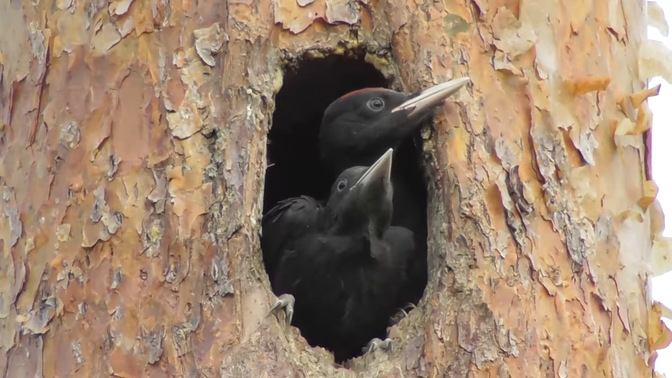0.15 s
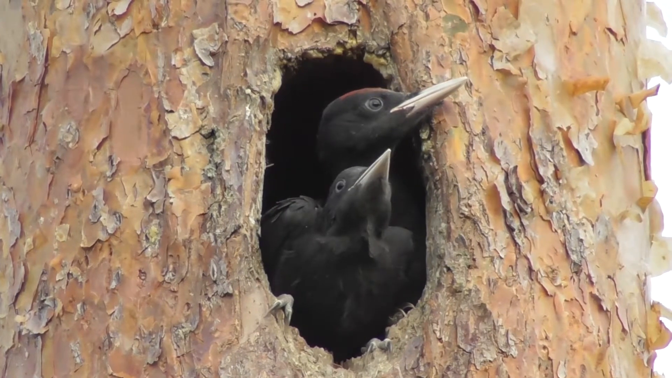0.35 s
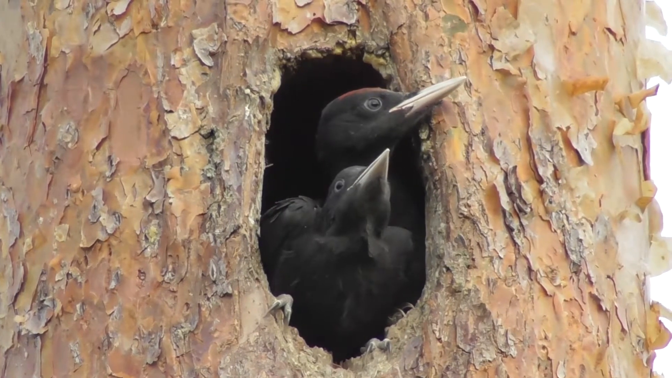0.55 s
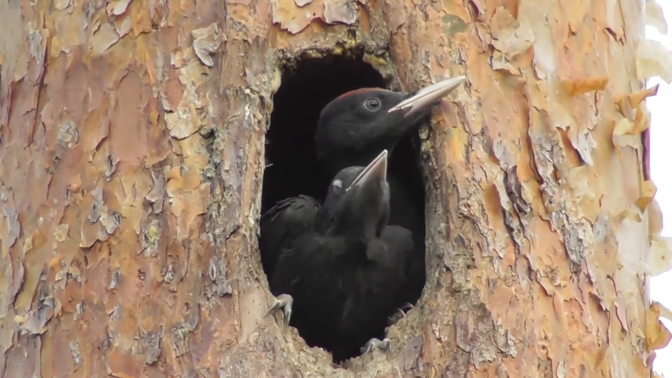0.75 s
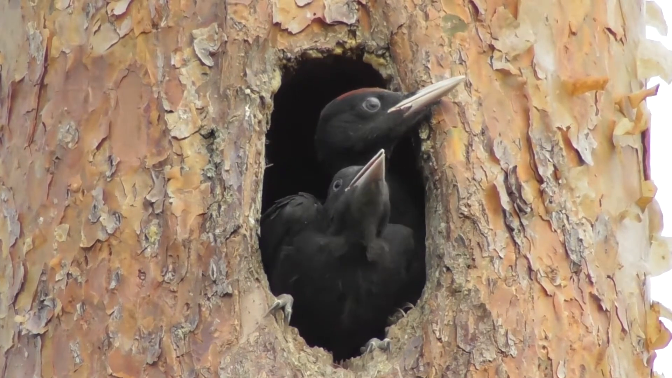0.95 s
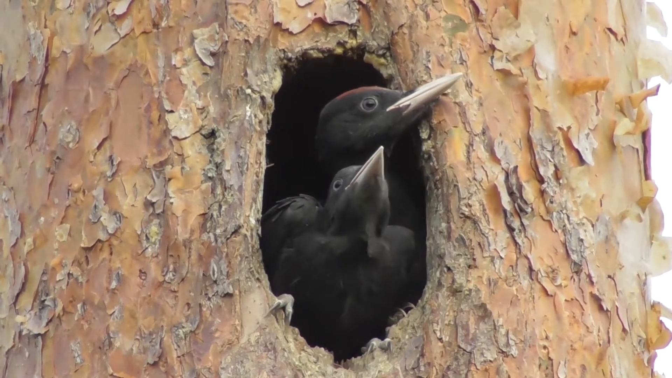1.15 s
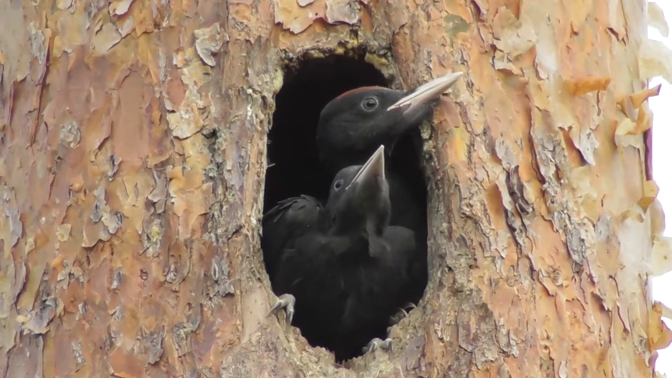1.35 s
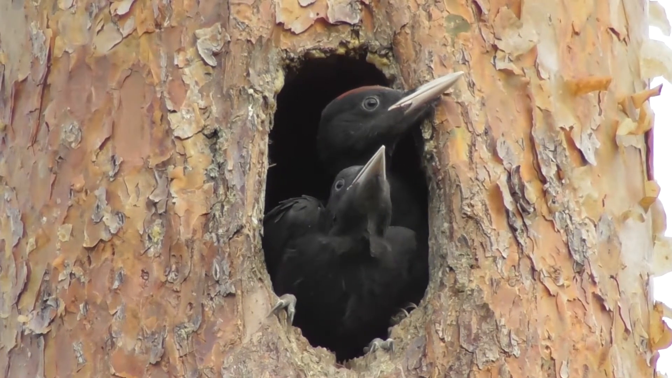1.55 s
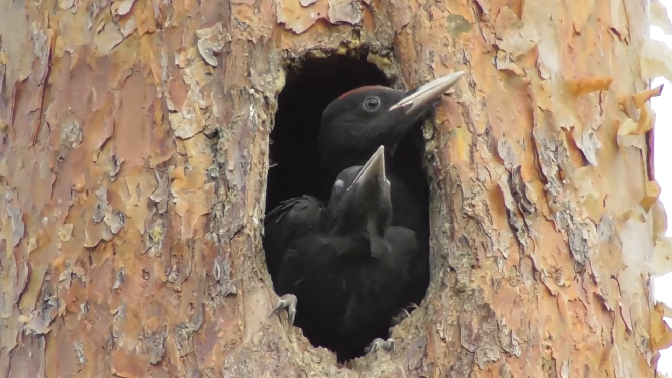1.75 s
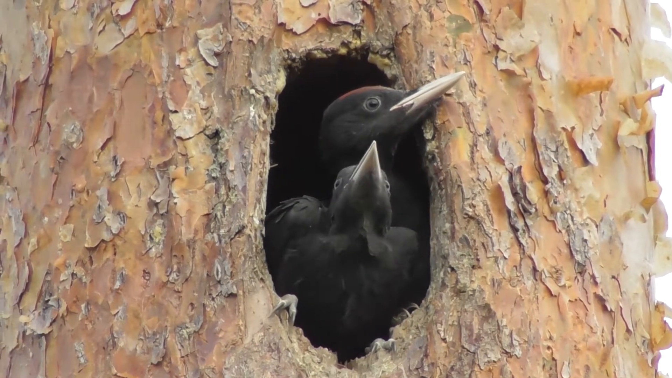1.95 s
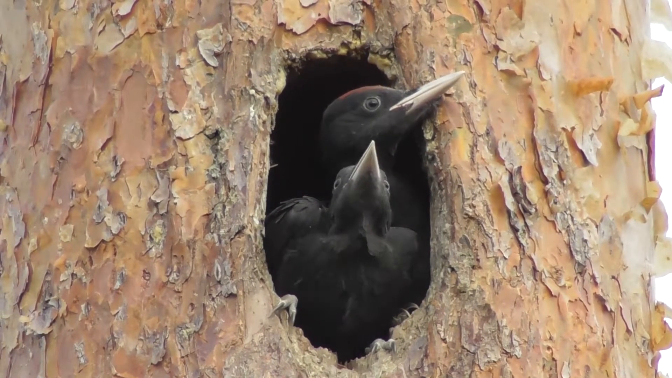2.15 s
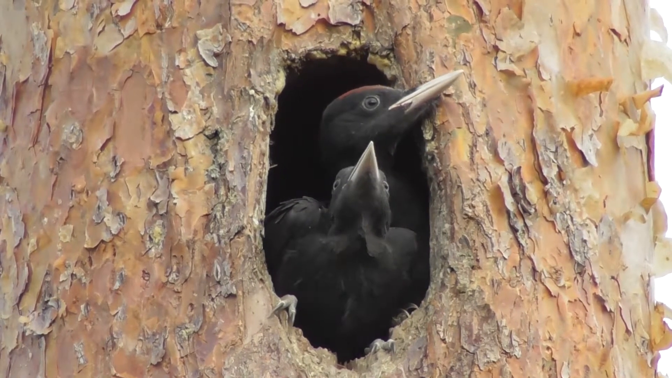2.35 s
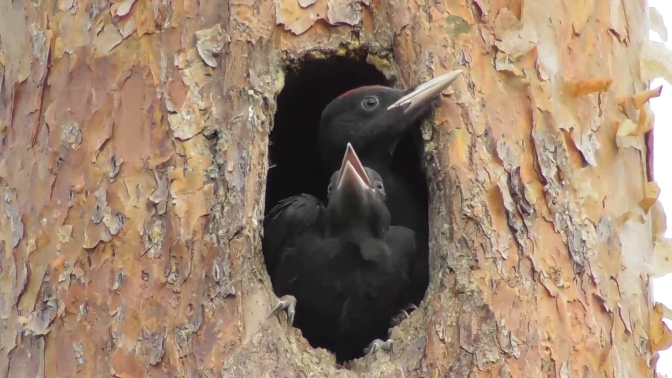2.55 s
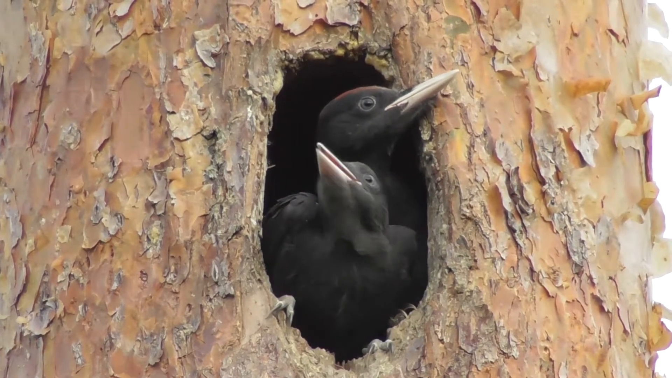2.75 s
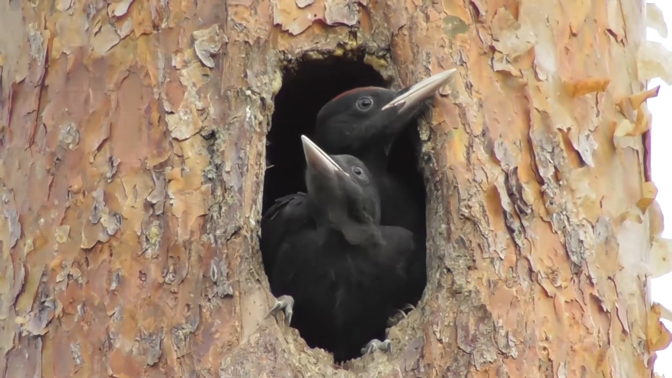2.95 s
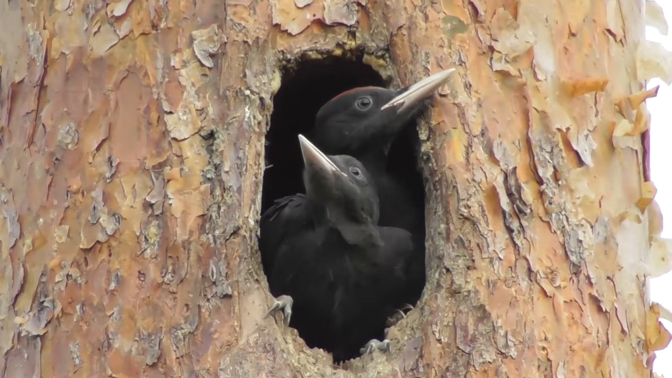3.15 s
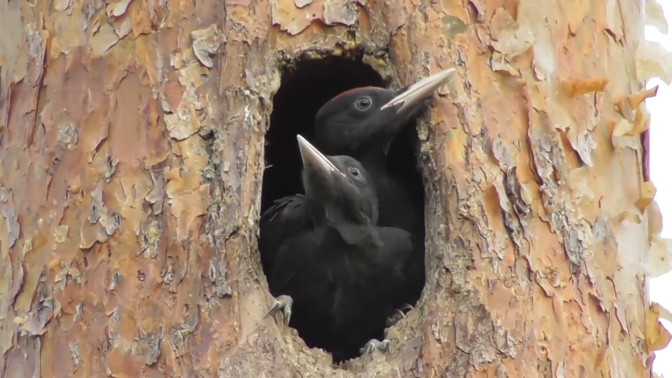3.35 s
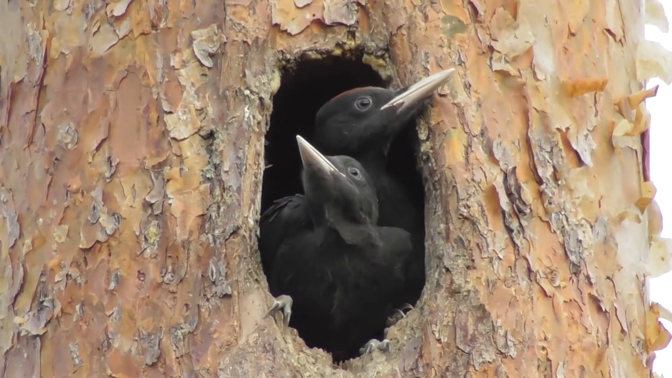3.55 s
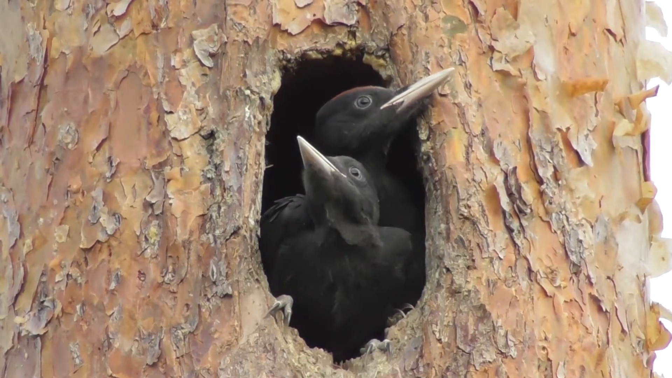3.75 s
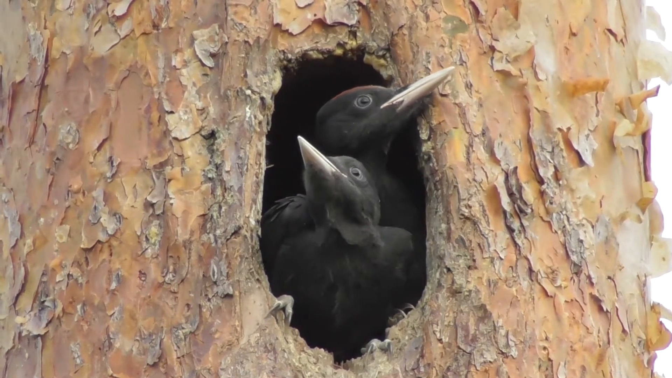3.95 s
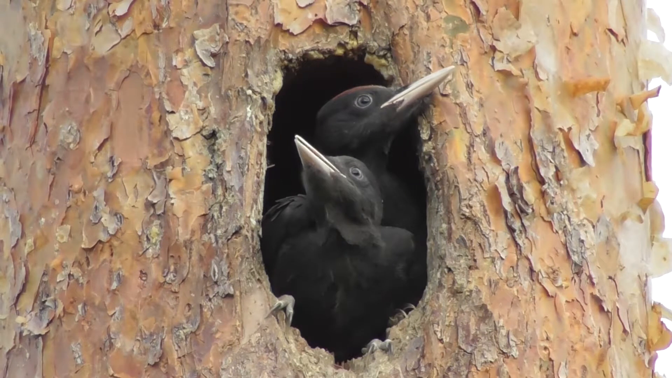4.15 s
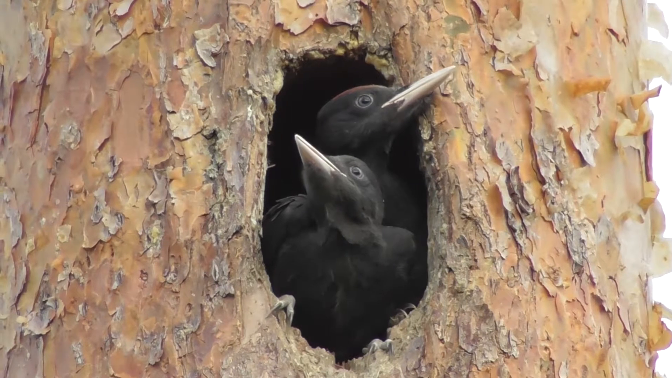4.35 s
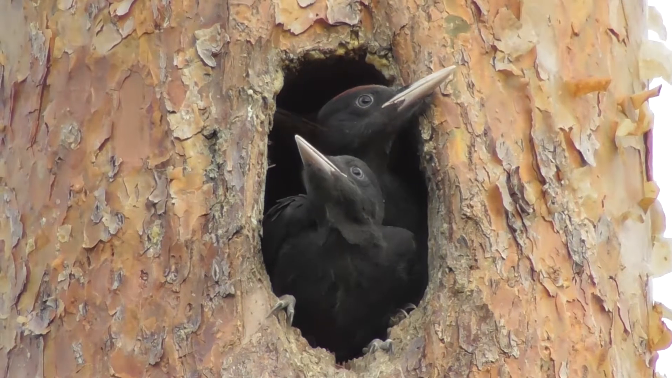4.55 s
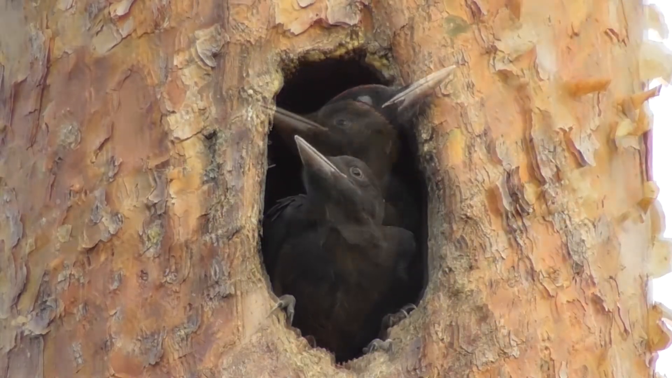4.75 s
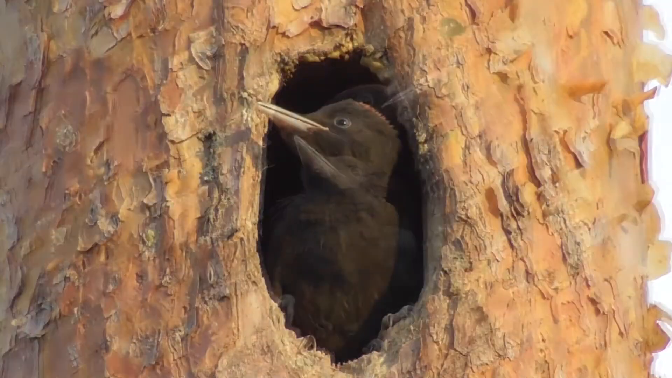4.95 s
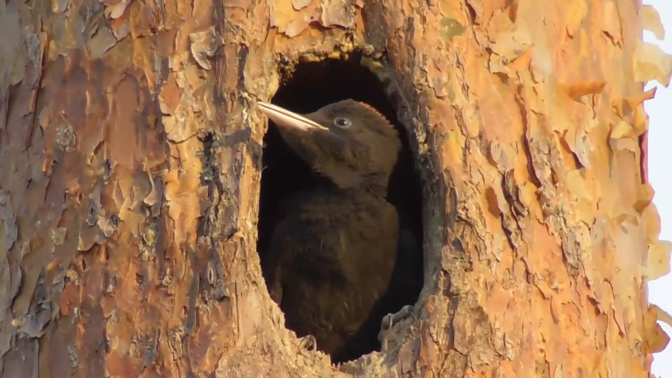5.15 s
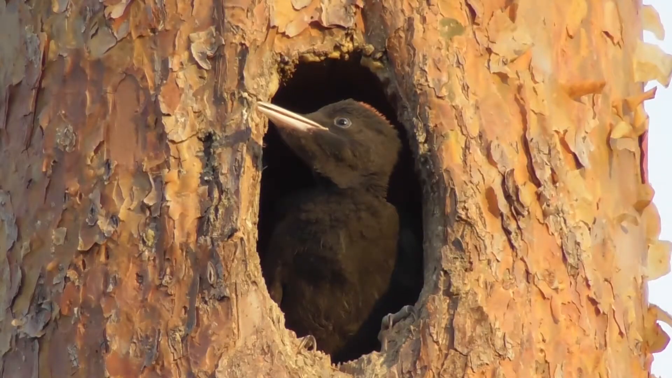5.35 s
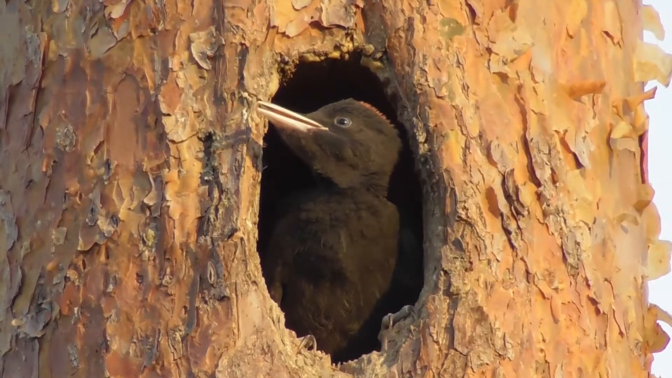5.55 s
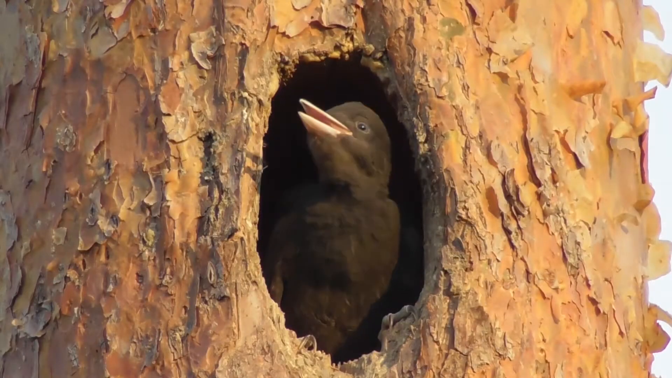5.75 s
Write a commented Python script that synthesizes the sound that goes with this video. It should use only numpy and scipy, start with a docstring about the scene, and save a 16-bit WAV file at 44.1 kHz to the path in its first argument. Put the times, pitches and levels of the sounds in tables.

```python
"""Distant traffic rumble and microphone hiss run throughout as shaped noise, under far songbirds' gliding tones.
Young woodpeckers soon yelp from a nest hole: short arched notes, an overtone stack filtered by the throat,
raspy with breath noise at start and end. Bills smack open with a tick and a low ring.
The trees answer the calls with a long thin echo: noise tails whose decay depends on frequency.
Later the far birds add rising whistles, repeated sweeps, buzzing trills and falling chips."""
import sys
import numpy as np
from scipy import signal
from scipy.fft import rfft, irfft, next_fast_len
from scipy.io import wavfile
from scipy.ndimage import uniform_filter1d, map_coordinates

SR = 44100
rng = np.random.default_rng(int(sys.argv[2]) if len(sys.argv) > 2 else 0)


def materialize(psi):
    """Save the field psi as 16-bit PCM at rate SR to the path in sys.argv[1].

    A 1-D psi becomes a single channel; in a 2-D psi each row is a channel.
    """
    bounded = np.clip(np.atleast_2d(psi).T, -1, 1)
    quanta = np.round(bounded * 32767).astype(np.int16)
    wavfile.write(sys.argv[1], SR, quanta)


N = 256199  # length in samples
TOP_HZ = 15700  # upper band limit


def amp(db):
    """Level law: 20 dB is a factor of ten in amplitude."""
    return 10 ** (np.asarray(db) / 20)


def unit(x):
    """Normalisation to a root mean square of one."""
    return x / np.sqrt(np.mean(x ** 2) + 1e-20)


def along(points, hz):
    """Interpolation of (Hz, value) points on a logarithmic frequency axis."""
    f, v = np.transpose(points)
    return np.interp(np.log(hz + 1), np.log(f + 1), v)


def wobble(rate, size):
    """Random modulation: a smooth curve through rate random knots a second."""
    knots = rng.standard_normal(int(size * rate / SR) + 4)
    return map_coordinates(knots, [np.arange(size) * rate / SR])


def filtered(x, response):
    """Linear filtering: the spectrum times a response of frequency."""
    m = next_fast_len(x.shape[-1] + 4096)
    spectrum = rfft(x, m) * response(np.fft.rfftfreq(m, 1 / SR))
    return irfft(spectrum, m)[..., :x.shape[-1]]


def add(track, s, sound):
    """Superposition: mixes a sound into the track at s seconds."""
    part = track[round(s * SR):][:len(sound)]
    part += sound[:len(part)]


# left-right balance: pitch_hz [Hz], left_minus_right_db [dB]
BALANCE = [(60, 5.5), (180, 2.5), (550, 1.5), (1650, 1.0), (4970, 0), (15000, 0.0)]


def leaned(pair):
    """Interchannel level difference: each side takes half, with opposite signs."""
    return filtered(pair, lambda hz: amp(np.outer([.5, -.5], along(BALANCE, hz))))


# slow levels of the air: start_s [s], rumble_db, roar_db, chorus_db, hiss_db [dB]
AIR_LEVELS = [(0.0, -58, -59.5, -74.5, -70.5), (0.6, -60.5, -59, -75.5, -70),
              (1.25, -56.5, -58, -75.5, -69.5), (2.1, -60, -59.5, -77.5, -70.5),
              (3.5, -59.5, -59, -73, -70), (4.63, -57, -59, -74, -69.5), (5.05, -60.5, -56, -74.5, -68),
              (5.81, -59, -57, -72.5, -69)]
# spectrum shapes of the four layers: pitch_hz [Hz], density_db [relative dB per Hz]
RUMBLE_SHAPE = [(12, -46), (20, -30), (22, -12), (38, -12.5), (61, -7.5), (75, 2.5), (88, 0), (124, -5),
                (150, -1.5), (177, -8), (199, -5), (217, -14), (260, -16.5), (340, -51), (570, -120)]
ROAR_SHAPE = [(130, -23), (220, -7), (275, -5), (350, -2.5), (461, -2.5), (692, -5.5), (1140, -13),
              (1600, -39), (2080, -55), (3520, -120)]
CHORUS_SHAPE = [(820, -28), (1400, -4.5), (1550, -14), (1810, -11), (2020, -4), (2400, -10), (2530, -12),
                (2840, -18), (2970, -12.5), (3310, -8), (5200, -18.5), (6760, -50), (11400, -120)]
HISS_SHAPE = [(2940, -57), (5000, -10), (5420, -12), (8470, -2), (9180, -3), (12300, -3.5), (15600, -3)]
# likeness of left and right noise: pitch_hz [Hz], correlation [-1 to 1]
LIKENESS = [(25, 0.59), (60, 0.88), (130, 0.85), (260, 0.21), (380, 0.71), (800, 0.74), (1650, 0.92),
            (2400, 1), (5000, 1), (7200, 0.98), (10400, 0.5), (15000, 0.21)]


def background():
    """Diffuse noise: four partly correlated layers, each with patches of random gain and a slow level."""
    start_s, *levels_db = np.transpose(AIR_LEVELS)
    shapes = (RUMBLE_SHAPE, ROAR_SHAPE, CHORUS_SHAPE, HISS_SHAPE)
    out = np.zeros((2, N))
    # the angle between mid and side sets the left-right correlation
    turn = lambda hz: np.arccos(np.clip(along(LIKENESS, hz), -1, 1)) / 2
    for level_db, shape, patchy_db in zip(levels_db, shapes, (0.85, 0.6, 3.5, 0.37)):
        cells = signal.stft(rng.standard_normal((2, N + 512)), nperseg=1024)[2]
        patches = uniform_filter1d(rng.standard_normal(cells.shape[1:]), 3, axis=0)
        patches = uniform_filter1d(patches, 12, axis=1)
        pair = signal.istft(cells * amp(patchy_db * unit(patches)), nperseg=1024)[1][:, :N]
        mid, side = filtered(pair, lambda hz: amp(along(shape, hz)) * [np.cos(turn(hz)), np.sin(turn(hz))])
        layer = leaned(np.array([mid + side, mid - side]))
        loudness = np.sqrt(np.mean(layer.mean(0) ** 2))
        out += amp(np.interp(np.arange(N) / SR, start_s, level_db)) * layer / loudness
    return out


def glide(start_s, end_s, first_hz, middle_hz, last_hz, level_db):
    """Frequency modulation: a pure tone on a smooth log-pitch curve through three pitches."""
    u = np.linspace(0, 1, round((end_s - start_s) * SR))
    curve = np.polyfit([0, .5, 1], np.log([first_hz, middle_hz, last_hz]), 2)
    hz = np.exp(np.polyval(curve, u))
    hz = hz * (1 + 0.0056 * wobble(155, len(u)))  # unsteady breath blurs the line
    waver_db = 1.5 * wobble(70, len(u))
    swell = abs(np.sin(np.pi * u)) ** .7
    return amp(level_db + waver_db) * swell * np.sin(2 * np.pi * np.cumsum(hz) / SR)


# far songbird whistles: start_s, end_s [s], first_hz, middle_hz, last_hz [Hz], level_db [dB before the path]
WHISTLES = [(0.037, .45, 2137, 1950, 1997, -78), (3.047, 3.443, 1590, 1573, 1578, -73),
            (3.426, 3.546, 1588, 1540, 1380, -77), (3.255, 3.366, 4190, 4250, 4200, -79),
            (3.459, 3.62, 4220, 4240, 4180, -79.5), (3.595, 3.684, 2440, 2376, 2320, -79),
            (3.72, 3.797, 3650, 3860, 4220, -67.5), (3.722, 4.091, 2390, 2300, 2252, -80),
            (3.967, 4.032, 3640, 3860, 4070, -68), (4.002, 4.122, 2050, 2006, 1810, -74.5),
            (4.101, 4.181, 3980, 3920, 3470, -64.5), (4.178, 4.218, 3680, 3300, 3000, -68.5),
            (4.736, 4.778, 3510, 3230, 2570, -67), (4.792, 4.86, 3040, 3040, 3020, -70),
            (4.877, 4.957, 2996, 3204, 3620, -59.5), (4.983, 5.023, 2290, 2900, 3100, -62.5),
            (5.013, 5.129, 3120, 3350, 3230, -66.5), (5.16, 5.208, 5950, 6370, 6500, -69),
            (5.21, 5.28, 7200, 7150, 7100, -67.5), (5.256, 5.295, 4290, 3950, 3850, -65),
            (5.258, 5.282, 6700, 5900, 5130, -72), (5.46, 5.49, 6300, 6250, 6350, -72),
            (5.544, 5.572, 6320, 6350, 6300, -70)]


def whistles(track):
    """Pure-tone radiation: each far whistle is one gliding sinusoid."""
    for whistle in WHISTLES:
        add(track, whistle[0], glide(*whistle))


LEAD_S, LEAD_DB_PER_S = .036, 993  # breath swells before the voice catches
ARCH_SHARE, CREST_SHARE = 0.0214, 0.49  # pitch drop at the arch ends; crest time over clear time
ARCH_DB_PER_S = 66  # level drop at the arch ends, per second of clear part
STUTTER_DB, STUTTER_PER_S = 2.2, 170  # slack membranes start and stop
BREAK_S, TAIL_DB_PER_S = 0.0072, 250  # the voice breaks down to a falling tail
RELEASE_S, RELEASE_DB = .016, 17.5  # extra drop after the tail
LEAD_RASP, CLEAR_RASP, TAIL_RASP = 0.864, 0.022, 0.75  # breath power share; the tail's adds to the clear one
FRAY_S = 0.0104  # time constant in which the tail frays


def gesture(on, clear, top_hz, db, lead_db, tail, tail_db, slack_hz, snap, slacken):
    """Membrane tension sets pitch: time, pitch, level and rasp of breathy lead-in, clear arch, raspy tail."""
    off = on + clear
    t = np.arange(on - LEAD_S, off + tail + RELEASE_S, 1 / SR)
    after = np.clip(t - off, 0, None)
    arch = np.interp(t, [on, on + CREST_SHARE * clear, off], [1, 0, 1]) ** 2  # zero at the crest
    sag = (1 + 2 * after / slacken) * np.exp(-2 * after / slacken)
    tension = np.interp(t, [on - snap, on, on + snap / 2], [0, .82, 1]) * sag
    hz = slack_hz + tension * (top_hz * (1 - ARCH_SHARE * arch) - slack_hz)

    voiced = db - ARCH_DB_PER_S * clear * arch
    release = RELEASE_DB * np.clip(after - tail, 0, None) / RELEASE_S
    trailing = tail_db - TAIL_DB_PER_S * after - release
    leading = lead_db - LEAD_DB_PER_S * np.clip(on - snap - t, 0, None)
    caught = np.clip((t - on) / 0.0021 + 1, 0, 1)
    broken = 1 - np.exp(-after / BREAK_S)
    level = caught * ((1 - broken) * voiced + broken * trailing) + (1 - caught) * leading

    rasp = np.interp(t, [on - 0.68 * snap, on], [LEAD_RASP, CLEAR_RASP])
    rasp = np.clip(rasp + TAIL_RASP * (1 - np.exp(-after / FRAY_S)), 0, 1)
    stutter = STUTTER_DB * np.sqrt(rasp) * wobble(STUTTER_PER_S, len(t))
    return t, hz, level + stutter, rasp


# windpipe and bill resonances: pitch_hz [Hz], gain_db [dB]
THROAT_GAIN = [(600, -59), (1100, -1.5), (1700, -19.5), (2150, -6.5), (2800, -5.5), (3350, -1), (4200, -12),
               (4850, -25), (5450, -25.5), (5800, -29.5), (6500, -19), (7100, -1.5), (8400, -3),
               (10000, -12.5), (12000, -24.5), (15500, -31)]
# nestling notes: start_s, clear_s [s], top_hz [Hz], level_db, lead_in_db [dB], tail_s [s], tail_db [dB],
# slack_hz [Hz], tighten_s, slacken_s [s], treble_db [dB above 6 kHz], throat_stretch [resonance ratio]
YELPS = [(.782, 0.0097, 1413, -36, -37.5, 0.015, -44, 1162, 0.0053, 0.007, -0.9, 0.99),
         (0.9696, 0.028, 1629, -30, -40, 0.049, -40, 1061, 0.0028, .011, 0, 0.95),
         (1.069, 0.0053, 1422, -34.5, -50, 0.012, -38.5, 1088, 0.0028, 0.004, -0.5, 0.91),
         (2.639, 0.018, 1415, -33, -39.5, 0.015, -44.5, 1076, 0.0059, 0.0046, 1.1, 0.97),
         (2.8158, 0.028, 1690, -27.5, -41, 0.039, -37, 1150, 0.0036, 0.0087, 0.6, 0.98),
         (2.9124, .007, 1382, -37, -49, 0.0089, -41, 1098, 0.0027, 0.00384, -3, 0.93),
         (5.7368, 0.027, 1699, -27, -39.5, 0.012, -35.5, 1236, 0.00326, 0.0064, 5.5, 0.98),
         (5.7895, .0065, 1738, -28, -36, 0.015, -30.5, 1260, 0.0042, 0.0068, 5.5, 0.96)]


def nestlings():
    """Source and filter: overtones slide through a fixed throat; slack membranes add jitter and pulsed breath."""
    out = np.zeros(N)
    for *note, treble_db, stretch in YELPS:
        t, hz, db, rasp = gesture(*note)
        throat = lambda f: amp(along(THROAT_GAIN, f / stretch) + treble_db * (f > 6000))
        # breath is brighter than the voice
        breath_colour = lambda f: throat(f) * amp(5.2 * np.log2(f / 5000 + 0.14))
        hz = hz * (1 + 0.0897 * rasp * wobble(501.3, len(t)))
        phase = 2 * np.pi * np.cumsum(hz) / SR
        k = np.arange(1, 15)[:, None]  # overtone numbers
        sizes = throat(k * abs(hz)) * (k * hz < TOP_HZ)
        overtones = np.sum(sizes * np.sin(k * phase + 1.4 * k * k), 0)
        tone = overtones / np.sqrt(np.sum(sizes ** 2, 0) / 2)
        pulses = 1 + 0.38 * np.cos(phase)  # one a cycle
        breath = unit(filtered(rng.standard_normal(len(t)) * pulses, breath_colour))
        fade = np.clip((t[-1] - t) / 0.00085, 0, 1) * np.clip((t - t[0]) / 0.00067, 0, 1)
        add(out, t[0], amp(db) * fade * (np.sqrt(1 - rasp) * tone + np.sqrt(rasp) * breath))
    return out


# the bill smacks open: start_s [s], level_db [dB, before common gain], hollow_db [dB, relative ring]
BILL_CLACKS = [(0.936, -41, 0), (2.786, -38.5, -2.5), (5.700, -44.5, 4)]


def clacks():
    """Impulse and cavity resonance: a dry tick, then the nest hollow answers with one low ring."""
    out, t = np.zeros(N), np.arange(SR // 30) / SR
    for s, db, hollow_db in BILL_CLACKS:
        noise = filtered(rng.standard_normal(len(t)), lambda f: amp(0.57 * along(THROAT_GAIN, f)))
        tick = amp(-60 * t / 0.1) * unit(noise)
        ring = np.sin(2 * np.pi * 850 * t) * (1 - np.exp(-t / 0.0019))
        hollow = amp(hollow_db - 60 * t / 0.029) * ring
        add(out, s, amp(db - 8.0) * (tick + 3.66 * hollow))
    return out


# forest echo: pitch_hz [Hz], decay_s [s for 60 dB, before t60_scale]
TREE_DECAY = [(1000, 3.9), (1700, 3.7), (3300, 1.7), (4200, 1.1), (7000, 0.81), (12000, 1.1)]


def echo(x, t60_scale, delay, spread):
    """Reverberant decay: each frequency of the answer from the trees dies at its own speed."""
    hz, t, cells = signal.stft(rng.standard_normal((2, SR)), SR, nperseg=256)
    decay = amp(-60 * t / (t60_scale * along(TREE_DECAY, hz)[:, None]))
    mid, side = signal.istft(cells * decay, SR, nperseg=256)[1]
    tail = np.array([mid + spread * side, mid - spread * side])
    late = np.pad(x, (round(delay * SR), 0))
    return signal.fftconvolve(late[None], tail / np.linalg.norm(tail[0]), axes=1)[:, :N]


def rising_whistles(track):
    """Upward frequency glide: a thin whistle comes four times, each louder than the last."""
    for k in range(4):
        s = 3.085 + .136 * k
        add(track, s, glide(s, s + .055, 4700, 5300, 6500, -92 + 4.8 * k))


# shape of one rising sweep: from_loudest_s [s], pitch_hz [Hz], shape_db [dB]
SWEEP_SHAPE = [(-.07, 2555, -16), (-.04, 2906, -11), (-.015, 3450, -5.5), (0, 3970, 1.5), (.009, 4500, -11),
               (0.02, 5950, -22), (.022, 6300, -34)]
# its repeats: loudest_s [s], level_db [dB, added to the shape]
SWEEP_REPEATS = [(4.346, -63.5), (4.495, -62.5), (4.648, -62)]


def sweeps(track):
    """Joint frequency and amplitude modulation: a far bird repeats one rising sweep."""
    s, hz, shape_db = np.transpose(SWEEP_SHAPE)
    t = np.arange(s[0], s[-1], 1 / SR)
    phase = 2 * np.pi * np.cumsum(np.interp(t, s, hz)) / SR
    for loudest_s, db in SWEEP_REPEATS:
        gain = amp(db + np.interp(t, s, shape_db) + 3.1 * wobble(128, len(t)))
        add(track, loudest_s + s[0], gain * np.sin(phase))


# far buzzing trills: start_s, end_s [s], pitch_hz [Hz], width_hz [Hz], level_db [dB before the path]
TRILLS = [(4.848, 4.885, 3230, 1900, -65), (4.925, 4.985, 3300, 1400, -64.5), (4.9, 4.99, 7330, 890, -73.5),
          (4.94, 4.98, 5100, 2100, -71.5), (5.34, 5.375, 3570, 1400, -66), (5.25, 5.33, 6700, 2900, -74),
          (5.46, 5.5, 3700, 2000, -75)]


def trills(track):
    """Band-limited noise: each buzzing trill is one short burst in a bell-shaped band."""
    for start_s, end_s, hz, width_hz, db in TRILLS:
        u = np.linspace(0, 1, round((end_s - start_s) * SR))
        band = filtered(rng.standard_normal(len(u)), lambda f: np.exp(-(2 * (f - hz) / width_hz) ** 2))
        add(track, start_s, amp(db) * np.sqrt(abs(np.sin(np.pi * u))) * unit(band))


# short falling chips: start_s [s], first_hz [Hz], level_db [dB before the path]
FALLING_CHIPS = [(5.019, 3065, -61), (5.025, 4300, -63.5), (5.09, 4200, -64.5), (5.092, 3080, -70),
                 (5.173, 2750, -75), (5.37, 4330, -65), (5.366, 2940, -69), (5.463, 2780, -74),
                 (5.545, 2700, -72), (5.657, 2770, -72), (5.687, 2750, -67)]
CHIP_S, CHIP_FALL = 0.0208, .86  # length; last pitch over first


def chips(track):
    """Downward frequency glide: each chip falls to a fixed ratio of its first pitch."""
    for s, hz, db in FALLING_CHIPS:
        add(track, s, glide(s, s + CHIP_S, hz, hz * CHIP_FALL ** 0.39, hz * CHIP_FALL, db))


# colour of far song along its path: pitch_hz [Hz], gain_db [dB]
PATH_COLOUR = [(1200, -1), (2500, 2), (3200, 1.5), (3900, 4.5), (4500, 3.5), (5100, 10), (6200, 3.5),
               (7500, 2)]


def songbirds():
    """Superposition and path filtering: all far birds share one colour."""
    out = np.zeros(N)
    for sing in (whistles, rising_whistles, sweeps, trills, chips):
        sing(out)
    return filtered(out, lambda f: amp(along(PATH_COLOUR, f)))


# size of the flicker between left and right: pitch_hz [Hz], gain_db [dB]
FLICKER = [(600, -14), (1200, -8), (2000, -24), (3300, -19), (5500, -39), (9000, -13), (15000, -3)]


def flickering_pair(x):
    """Interchannel difference: the left favours the bass, and the balance flickers quickly."""
    side = filtered(x * wobble(250, N), lambda hz: amp(along(FLICKER, hz)))
    return leaned(np.array([x + side, x - side]))


# colour of the calls leaving the hole sideways: pitch_hz [Hz], gain_db [dB]
SIDEWAYS_COLOUR = [(800, -10), (1500, -0.5), (2200, 1), (3300, -2.6), (4300, 6), (5500, 12), (7000, 3.2),
                   (12000, -5.5)]


def scene():
    """Direct and reflected sound: the echoes hear the calls from the side, in another colour."""
    near, far = nestlings() + clacks(), songbirds()
    aside = filtered(near, lambda hz: amp(along(SIDEWAYS_COLOUR, hz)))
    trunks = amp(-16.5) * echo(aside, t60_scale=0.26, delay=.008, spread=0.13)
    forest = amp(-25.5) * echo(aside, t60_scale=1.02, delay=0.028, spread=0.028)
    glade = amp(-3.0) * echo(far, t60_scale=.6, delay=.005, spread=.05)
    return flickering_pair(near + far) + trunks + forest + glade + background()


def record(dry):
    """Band limiting: a narrow band near 5 kHz dips by up to 6 dB, and nothing is kept above the limit."""
    notch_db = lambda hz: -6 * np.exp(-((hz - 5150) / 420) ** 2)
    return filtered(dry, lambda hz: amp(notch_db(hz)) * (hz < TOP_HZ))


dry = scene()
out = record(dry)
materialize(out)
```